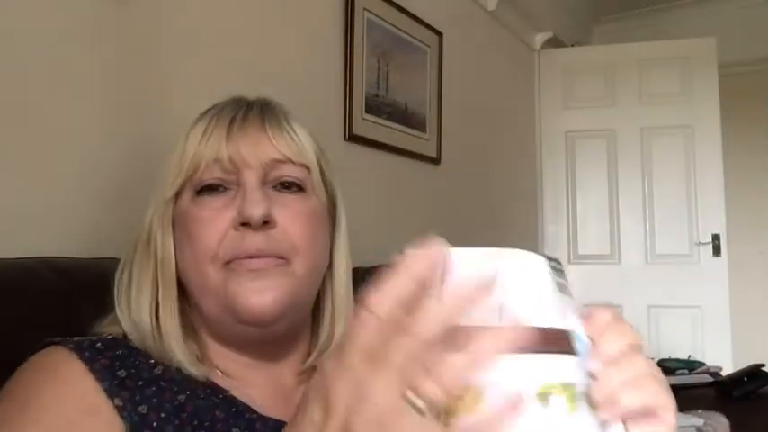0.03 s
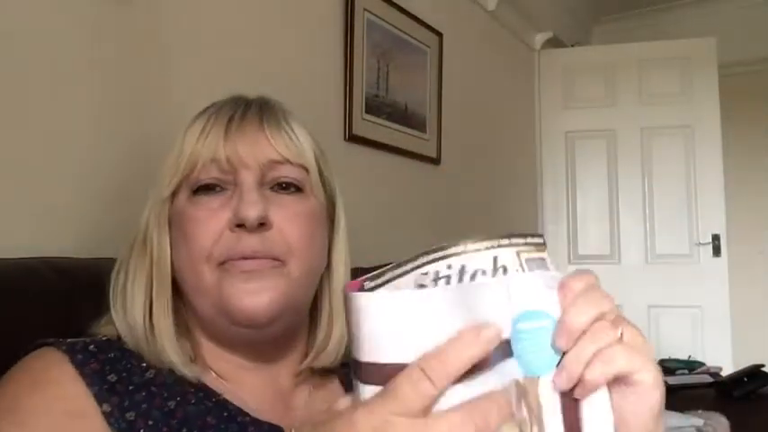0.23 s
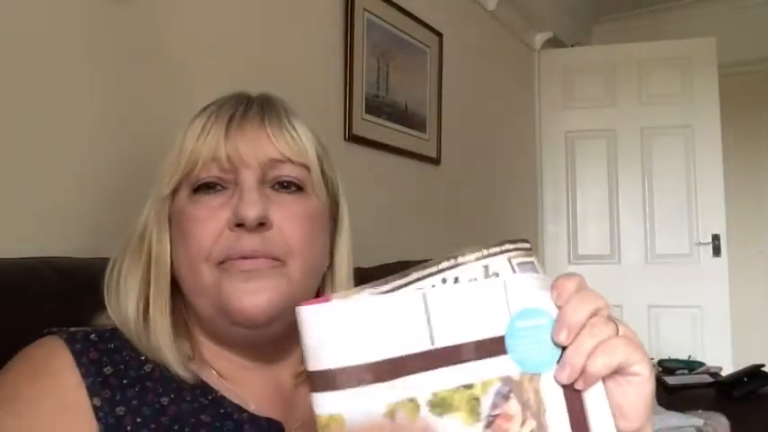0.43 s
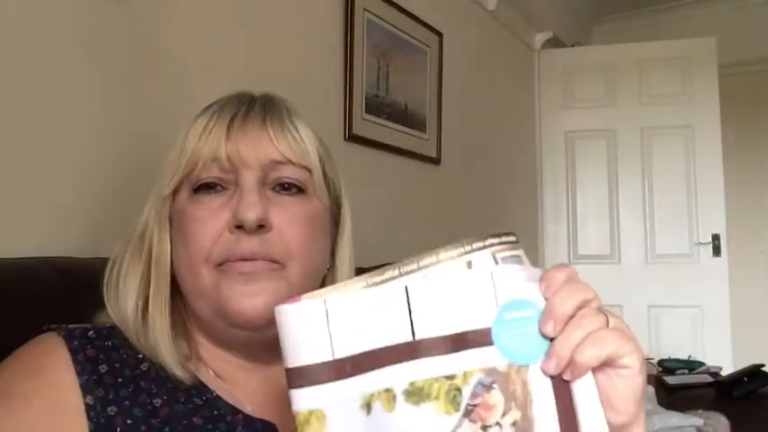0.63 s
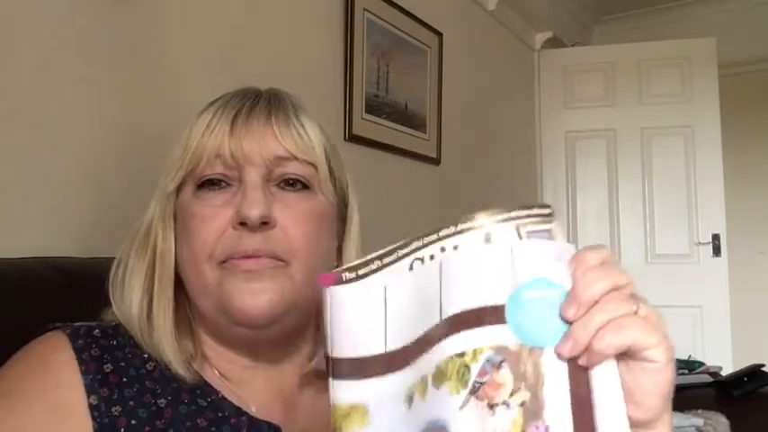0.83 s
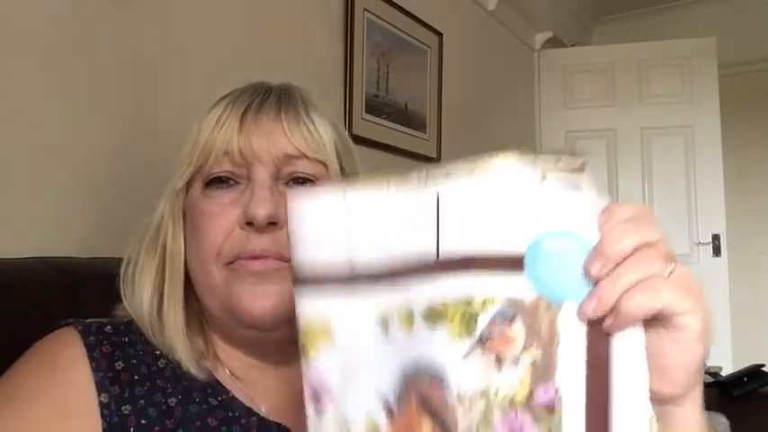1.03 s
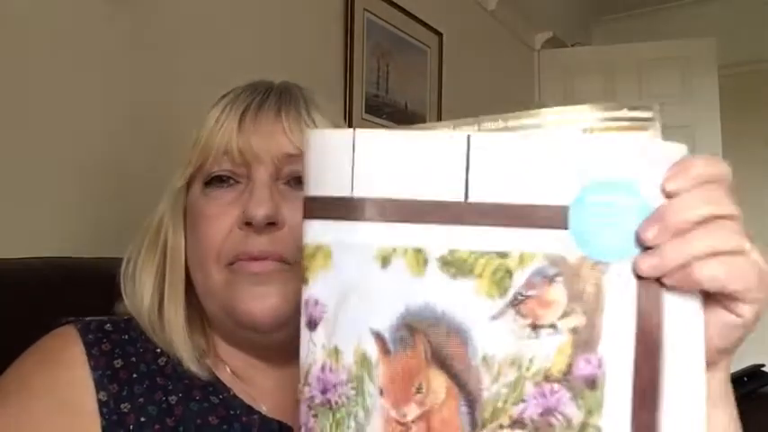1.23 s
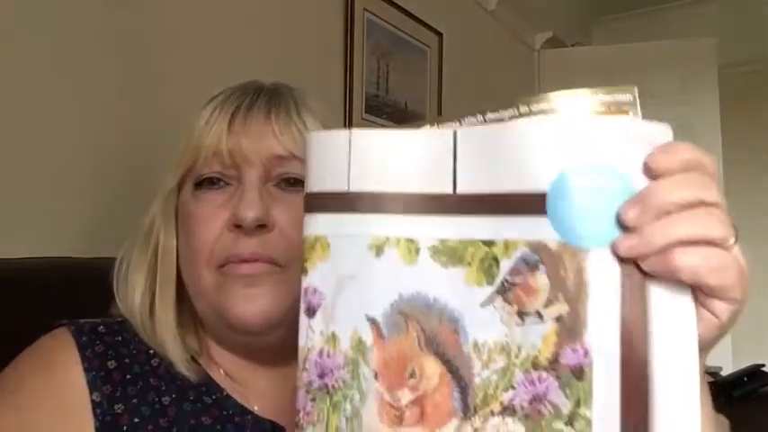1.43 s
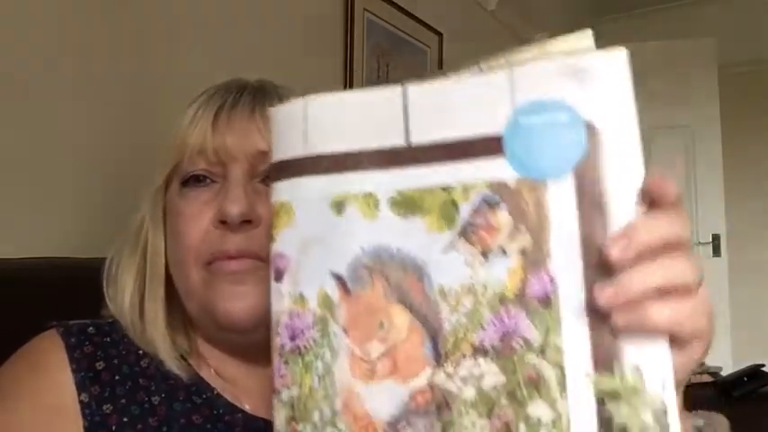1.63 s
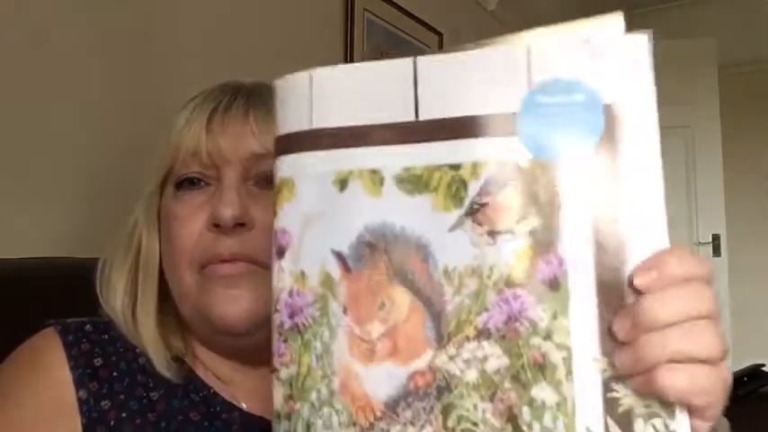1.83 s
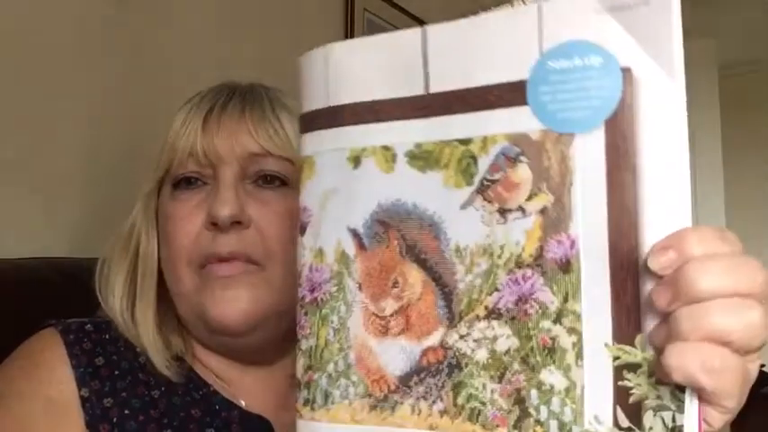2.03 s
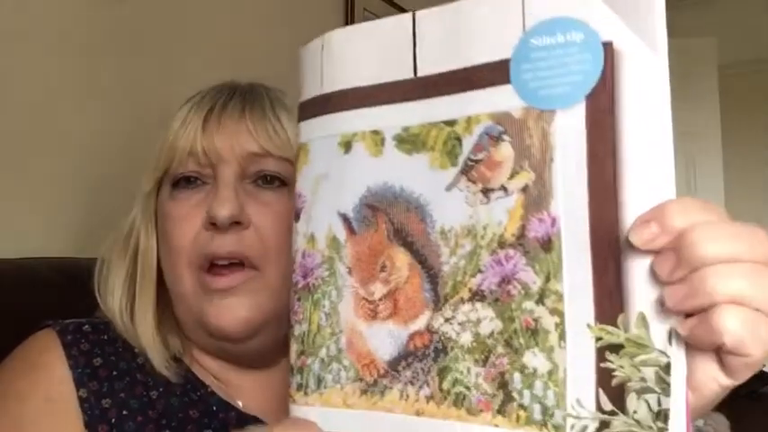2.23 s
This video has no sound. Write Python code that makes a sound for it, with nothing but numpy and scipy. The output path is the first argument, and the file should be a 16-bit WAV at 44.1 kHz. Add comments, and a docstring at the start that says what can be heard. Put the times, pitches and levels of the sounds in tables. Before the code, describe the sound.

Magazine paper rustles close to the microphone in a small furnished room. Rubbing and small crinkles start at once, with a strong page slap near 0.3 s, sliding hiss and another flip around 0.55 s, and sharp snaps at 0.8 to 0.9 s. A bright crackle comes at 1.2 s, fine ticks and a swish around 1.4 to 1.7 s, then near quiet, with a faint crinkle at 2.1 s.

```python
"""In a small living room, a glossy magazine is folded back, turned over and lifted close to a microphone.
Sheets slide and hands rub the cover: hiss and tiny clicks, shaped in strength and spectrum.
The bundle bumps softly (decaying low noise), while creases and edges tick (very short bright clicks).
Slack pages buckle with dull pops and taut ones flip with clean slaps: snaps passed through the page's own spectrum.
A few tones ring on in the paper, and the room rings briefly over a quiet floor of noise."""
import sys
import numpy as np
from scipy import signal
from scipy.fft import rfft, irfft
from scipy.io import wavfile

SR = 44100
rng = np.random.default_rng(int(sys.argv[2]) if len(sys.argv) > 2 else 0)


def wrap_up_sound(samples):
    """Save the sound to the file named by the first command line argument, as 16-bit audio."""
    columns = np.atleast_2d(samples).T
    # keep every value between -1 and 1, then stretch to whole-number steps
    tamed = np.clip(columns, -1, 1)
    steps = np.round(tamed * 32767).astype(np.int16)
    wavfile.write(sys.argv[1], SR, steps)


N = 100283  # length of the scene [samples]
SIZE = 8192  # length of one short sound [samples]

# Friction: average clicks per second, mean of their random extra level,
# and level of the clicks against the hiss, in general and in scuffs
GRAINS_PER_S, GRAIN_SPREAD_DB, GRAIN_DB, SCUFF_GRAIN_DB = 2200, 3, -5, 3
TILT_FROM_HZ = 590  # a treble tilt starts here

# Overall trims of the sliding and rubbing; how steeply the hiss grows with sliding speed
SLIDE_DB, RUB_DB, SLIDE_SWELL = 0.5, -3.5, 1.57
FLOOR_DB = -62.5
BUMP_DECAY_S = 0.02

# Ringing after a tick, a pop or a slap: decay time, and level against the snap
TICK_RING_S, TICK_RING_DB = 0.0032, -1.5
POP_RING_DB = 4
SLAP_RING_S, SLAP_RING_DB = 0.0059, -5
RATTLE_S, RATTLE_DB = 0.0094, -12.5  # neighbouring sheets shiver after a pop

# Delay of the bending wave at 1 kHz in pops and slaps; lowest note of a page
BEND_DELAY_S, SLAP_BEND_S, POP_LOW_HZ = 0.00153, 0.001684, 106

RESONANCE_DB = -13.5  # trim of all the resonances
ROOM_ONSET_S = 0.0023  # build-up time of the reflections
LOW_CUT_HZ, TOP_HZ = 38, 15900  # lower and upper limit of the recorder


def undb(db):
    """Turn decibels into gain."""
    return 10 ** (np.asarray(db) / 20)


def unit(x):
    """Scale a sound to an average strength (rms) of 1."""
    return x / np.sqrt(np.mean(x ** 2))


def burst(x):
    """Scale a short sound to the energy of 10 ms at rms 1."""
    return x * np.sqrt(.01 * SR / np.sum(x ** 2))


def bins(size):
    """List the frequencies of a spectrum [Hz], with at least 1 Hz so that logarithms work."""
    return np.maximum(np.fft.rfftfreq(size, 1 / SR), 1)


def gains(points, size):
    """Draw a gain curve through points (frequency [Hz], level [dB])."""
    hz, db = np.array(points).T
    return undb(np.interp(np.log(bins(size)), np.log(hz), db))


def colour(x, points, tilt=0):
    """Give a sound a spectrum, its treble tilted in dB per octave."""
    octaves = np.log2(np.maximum(bins(len(x)) / TILT_FROM_HZ, 1))
    gain = gains(points, len(x)) * undb(tilt * octaves)
    return irfft(rfft(x) * gain, len(x))


def causal(gain):
    """Make a filter that has these gains and reacts as early as it can (minimum phase)."""
    cepstrum = irfft(np.log(gain + 1e-5))
    # Folding the second half onto the first removes all response before time zero
    cepstrum[1:SIZE // 2] *= 2
    cepstrum[SIZE // 2 + 1:] = 0
    return np.exp(rfft(cepstrum))


def add(out, x, start):
    """Mix a sound in at a time [s]."""
    i = max(int(start * SR), 0)
    out[i:i + len(x)] += x[:max(N - i, 0)]


def friction(grain_db=GRAIN_DB):
    """Fibres catch and let go: tiny clicks of uneven size over a smooth hiss."""
    clicks = (rng.random(N) < GRAINS_PER_S / SR) * np.sign(rng.standard_normal(N))
    sizes = undb(GRAIN_SPREAD_DB * np.minimum(rng.exponential(size=N), 5))
    hiss = rng.standard_normal(N)
    return hiss + undb(grain_db) * unit(clicks * sizes)


def waver(unsteady_db):
    """Quick random changes of strength, up to unsteady_db either way, as the grip shifts."""
    slow_noise = [(1, -20), (12, 0), (40, 0), (140, -24), (500, -80)]  # (frequency [Hz], level [dB])
    chance = unit(colour(rng.standard_normal(N), slow_noise))
    return undb(unsteady_db * np.tanh(chance))


def snap(ring_s, ring_db):
    """Spectrum of a sudden release and the dense, quickly damped ringing of the sheet."""
    ring = rng.standard_normal(SIZE) * np.exp(-np.arange(SIZE) / SR / ring_s)
    x = ring / np.linalg.norm(ring) * undb(ring_db)
    x[0] += 1  # the release itself is one click
    return rfft(x)


def sliding(t):
    """Sheets speed up and slow down against each other; the hiss follows their speed."""
    # One stroke a row: (start [s], fastest [s], end [s], level before the trim [dB], tilt [dB per octave])
    strokes = [(-.03, 0.02, 0.1, -59, -0.5), (.07, 0.16, 0.19, -65, 0), (0.182, 0.192, 0.23, -54, 1),
               (0.206, 0.254, 0.39, -49, -3), (0.29, 0.38, 0.59, -54.5, -2.5),
               (0.406, 0.56, 0.68, -49, -0.5), (0.65, 0.772, 0.88, -53.5, -1),
               (0.87, 0.948, 1.09, -56.5, -3.5), (1.045, 1.121, 1.4, -59, -4.5),
               (1.23, 1.35, 1.5, -67.5, -5), (1.427, 1.506, 1.703, -54.5, -4),
               (1.601, 1.644, 1.73, -52, -4.5), (1.657, 1.755, 1.814, -57.5, -3),
               (1.714, 1.9, 2.035, -65.5, -1.5), (1.98, 2.113, 2.7, -64.5, -1)]
    # Spectrum of sliding paper: (frequency [Hz], relative level [dB])
    slide_colour = [(40, -60), (500, -21.5), (2000, -5.5), (3500, 3), (6000, 2.5), (7400, 0.5), (8900, 3.5),
                    (10000, 1), (13000, 3.5), (15500, -5)]
    out = np.zeros(N)
    for start, fastest, end, db, tilt in strokes:
        speed = np.sin(np.pi / 2 * np.interp(t, [start, fastest, end], [0, 1, 0]))
        hiss = unit(colour(friction(), slide_colour, tilt))
        out += undb(db) * speed ** SLIDE_SWELL * hiss
    return out * undb(SLIDE_DB) * waver(unsteady_db=0.9)


def rubbing(t):
    """Fingers and palms drag on the cover with a duller, rougher friction."""
    # Strength of the rub: (time [s], level before the trim [dB])
    rub_levels = [(0, -51.5), (.07, -47.5), (.14, -60.5), (.27, -43.5), (.36, -53.5), (.6, -50.5),
                  (.68, -68), (.78, -56.5), (.86, -48), (.97, -57.5), (1.28, -58), (1.42, -67), (1.52, -63),
                  (1.66, -71), (1.82, -89), (1.97, -63), (2.07, -75), (2.27, -72)]
    # Spectrum of skin on the cover: (frequency [Hz], relative level [dB])
    rub_colour = [(100, -11), (300, 5), (470, 4.5), (595, 11), (740, 0), (1500, 5.5), (2200, 0),
                  (3200, 0.5), (5000, -9), (9000, -20.5)]
    level = undb(np.interp(t, *np.array(rub_levels).T) + RUB_DB)
    return level * waver(unsteady_db=5.5) * unit(colour(friction(), rub_colour))


def quiet_floor():
    """A steady, mostly low background noise."""
    # Spectrum of the background: (frequency [Hz], relative level [dB])
    floor_colour = [(20, -44), (40, -6), (62, 0), (120, 0.5), (220, 1.5), (450, -8), (1000, -16),
                    (3000, -12), (8000, -38), (15500, -61)]
    return undb(FLOOR_DB) * unit(colour(rng.standard_normal(N), floor_colour))


def bumps():
    """Soft low thuds of the whole bundle in the hands: dying noise with little treble."""
    # One bump a row: (time [s], level before doubling [dB])
    bump_rows = [(.002, -54), (0.048, -55.5), (.16, -61), (0.243, -56.5), (0.329, -62), (.56, -56),
                 (0.822, -52.5), (.884, -51.5), (1.097, -60.5), (1.39, -58.5), (1.852, -65)]
    # Spectrum of a thud: (frequency [Hz], relative level [dB])
    bump_colour = [(25, -42), (45, -12), (65, 4.5), (110, -5.5), (200, 1), (400, -14.5), (1200, -61.5)]
    out, age = np.zeros(N), np.arange(SIZE) / SR
    for start, db in bump_rows:
        push = rng.standard_normal(SIZE) * np.exp(-age / BUMP_DECAY_S)
        thud = irfft(rfft(push) * causal(gains(bump_colour, SIZE)))
        add(out, undb(db) * 2 * burst(thud), start)
    return out


def ticks():
    """Small creases and edges give way with bright, very short clicks."""
    # One tick a row: (time [s], level [dB], centre [Hz], width [octaves])
    tick_rows = [(0.0219, -51, 3000, 1.44), (0.059, -50.5, 2880, 1), (.097, -55, 5850, 1.1),
                 (.1785, -54.5, 1930, 1.3), (.188, -51, 4940, 0.43), (0.2364, -47, 10900, 2.4),
                 (0.815, -42, 3870, 0.41), (.912, -63, 10100, 0.45), (1.094, -57, 5440, 4),
                 (1.337, -52, 3940, 0.89), (1.39, -56, 5800, .6), (1.434, -48.5, 12800, 1.44),
                 (1.4535, -40.5, 4200, 1.9), (1.4535, -49.5, 13000, 0.32), (1.461, -51, 13000, 0.96),
                 (1.484, -47.5, 9820, 4.9), (1.4884, -42.5, 11100, 2.1), (1.493, -48, 13100, 0.35),
                 (1.5079, -49.5, 9000, 1.1), (1.5164, -46.5, 3140, 0.84), (1.534, -55, 12000, 0.68),
                 (1.942, -60, 2900, .5)]
    out, f = np.zeros(N), bins(SIZE)
    for start, db, hz, width in tick_rows:
        hump = 1 / (1 + .5 * (np.log2(f / hz) / width) ** 2) ** 2
        gain = hump / np.hypot(1, (f / TOP_HZ) ** 10)
        click = irfft(snap(TICK_RING_S, TICK_RING_DB) * causal(gain))
        add(out, undb(db) * burst(click), start)
    return out


def page(hz, rise, fall):
    """Gains of a bent page: a rise to a corner, a fall above it, fading out under its lowest note."""
    f = bins(SIZE)
    octaves = np.log2(f / hz)
    corner = 1 / np.hypot(undb(-rise * octaves), undb(fall * octaves))
    return corner / np.hypot(1, (POP_LOW_HZ / f) ** 2)


def bend(delay_s):
    """The bending wave brings the lows a little late: the delay shrinks as the frequency rises."""
    return np.exp(-4j * np.pi * delay_s * np.sqrt(1000 * bins(SIZE)))


def rattle():
    """Spectrum of the loose sheets shivering just after a pop."""
    age = np.arange(SIZE) / SR / RATTLE_S  # counted in decay times
    x = rng.standard_normal(SIZE) * np.sqrt(age) * np.exp(-age)
    return rfft(x / np.linalg.norm(x)) * undb(RATTLE_DB)


def pops():
    """Slack pages flip their curve and shiver against their neighbours."""
    # One loose buckle a row: (time [s], level [dB], corner of its spectrum [Hz],
    # rise below the corner [dB per octave], fall above it [dB per octave], ring [s])
    pop_rows = [(0.0427, -46.5, 1690, 4.5, 24, 0.0018), (0.054, -50, 900, -1.5, 29, 0.0027),
                (0.063, -45, 775, 1.5, 17, 0.0016), (0.241, -46.5, 570, 3.5, 37, 0.0036),
                (.347, -47, 720, 7.5, 20, .012), (0.461, -46, 995, 2, 14, 0.016),
                (.472, -46, 1000, 1, 4.5, 0.0069), (0.562, -43, 970, 10, 47, 0.0041),
                (.589, -43.5, 1100, 0.5, 12.5, 0.022), (0.8233, -38, 1710, 1, 14, 0.0057),
                (0.849, -41.5, 1700, 11.5, 15, 0.023), (0.8837, -41.5, 1950, 3, 26, 0.0018),
                (0.9116, -41.5, 1410, 0.5, 10, 0.00094), (1.062, -51, 1660, 1.5, 10, 0.0015),
                (1.094, -44.5, 600, -4, 1.5, 0.0053), (1.1832, -43.5, 3900, 2, 18, 0.0062),
                (1.337, -49, 487, 2.5, 11.5, 0.0097), (1.509, -50, 704, -7, 1, 0.0044),
                (1.5543, -50, 1100, -1, 11, 0.0059), (2.086, -55, 306, -2, 10, 0.011),
                (2.104, -46, 2610, 5.5, 35, 0.0072), (2.1085, -46, 2600, 10, 17, 0.0035),
                (2.218, -55, 274, 0, 17, 0.0043)]
    out = np.zeros(N)
    for start, db, hz, rise, fall, ring_s in pop_rows:
        source = snap(ring_s, POP_RING_DB) + rattle()
        sound = source * causal(page(hz, rise, fall)) * bend(BEND_DELAY_S)
        add(out, undb(db) * burst(irfft(sound)), start - BEND_DELAY_S / 2)
    return out


def scuffs(t):
    """Short, crackly slips of sheet on sheet that swell and die."""
    # One scuff a row: (time of the peak [s], level [dB], rise [s], decay [s], tilt [dB per octave])
    scuff_rows = [(.105, -48.5, .008, 0.0041, -3), (1.179, -37, 0.0014, 0.0062, -5),
                  (1.198, -47.5, 0.016, 0.016, -1.5), (1.219, -29, 0.0031, 0.0035, -1.5),
                  (1.227, -40.5, 0.0031, 0.022, -3), (2.092, -50, 0.032, 0.036, -4),
                  (2.1098, -43, 0.0078, 0.0028, 1.5)]
    # Spectrum of a scuff: (frequency [Hz], relative level [dB])
    scuff_colour = [(30, -37), (200, -5), (550, -7), (1000, -8.5), (2000, -2), (3600, 3), (7000, 0),
                    (8900, 4), (12000, -2), (15500, -8)]
    out = np.zeros(N)
    for peak, db, rise_s, decay_s, tilt in scuff_rows:
        envelope = np.exp(-np.maximum((peak - t) / rise_s, (t - peak) / decay_s))
        crackle = unit(colour(friction(SCUFF_GRAIN_DB), scuff_colour, tilt))
        out += undb(db) * envelope * crackle
    return out


def slaps():
    """Taut pages flip in one clean slap and ring at one note, with a faint shiver of the sheet."""
    # One slap a row: (time [s], level [dB], corner [Hz], rise [dB per octave], fall [dB per octave],
    # note [Hz], width of the note [Hz], strength of the note [dB])
    slap_rows = [(.129, -46.5, 3730, -0.5, 23, 2970, 900, 6), (0.1586, -44.5, 1100, 3, 12, 592, 80, 16),
                 (.178, -41, 1500, -2.5, 11, 580, 89, 14), (0.3178, -28.8, 920, 3.5, 17.5, 546, 130, 10.5),
                 (.3275, -40.5, 900, 13, 17, 720, 60, 15), (0.5548, -36.5, 1350, 1, 47, 1220, 280, 6.5),
                 (0.8155, -29, 1990, 3.5, 23.5, 1420, 800, 2), (.8813, -30.5, 2840, 3, 42, 1180, 377, 11),
                 (1.219, -47, 750, 11, 15, 570, 59.6, 26), (1.3898, -44, 3140, -1, 20, 2900, 600, 12)]
    out = np.zeros(N)
    for start, db, hz, rise, fall, note_hz, width_hz, note_db in slap_rows:
        peak = undb(note_db) / np.hypot(1, 2 * (bins(SIZE) - note_hz) / width_hz)
        note = np.hypot(1, peak)
        source = snap(SLAP_RING_S, SLAP_RING_DB)
        sound = source * causal(page(hz, rise, fall) * note) * bend(SLAP_BEND_S)
        add(out, undb(db) * burst(irfft(sound)), start - SLAP_BEND_S / 2)
    return out


def resonate(x):
    """The folded bundle and the space around it favour a few tones, which ring on after the paper moves."""
    # Narrow resonances: (frequency [Hz], time to fall by 60 dB [s], level before the trim [dB])
    tones = [(222, .25, -12), (540, .25, -1), (585, .25, -3), (760, .15, -3), (1158, .12, -7),
             (1310, .1, -3), (8885, .08, -3)]
    out = x.copy()
    for hz, t60, db in tones:
        damping = np.log(1000) / (t60 * SR)  # loss per sample
        pole = np.exp(2j * np.pi * hz / SR - damping)
        ringing = signal.lfilter([1], [1, -pole], x).real
        out += undb(db + RESONANCE_DB) * 2 * damping * ringing
    return out


def room(x):
    """Dense reflections of a furnished room: noise bands that die away, the top one fastest."""
    # Bands of the room: (centre [Hz], time to fall by 60 dB [s], level against the direct sound [dB])
    room_bands = [(149, 1, -11), (600, 0.28, -8.5), (1470, 0.47, -10.5), (4040, 0.78, -13.5),
                  (11600, 0.18, -9.5)]
    size = SR // 2
    age, noise, tail = np.arange(size) / SR, rfft(rng.standard_normal(size)), 0
    centres = np.log([row[0] for row in room_bands])
    # Each share is 1 at its own centre and 0 at the others, so neighbouring bands crossfade
    for share, (hz, t60, db) in zip(np.eye(len(room_bands)), room_bands):
        band = irfft(noise * np.interp(np.log(bins(size)), centres, share), size)
        build_up = 1 - np.exp(-(age / ROOM_ONSET_S) ** 2)
        envelope = np.exp(-np.log(1000) * age / t60) * build_up
        tail = tail + undb(db) * band * envelope / np.linalg.norm(envelope)
    return x + signal.fftconvolve(x, tail)[:N]


def scene():
    """The magazine in the room, the same in both channels."""
    t = np.arange(N) / SR
    movements = sliding(t) + rubbing(t) + ticks() + pops() + scuffs(t) + slaps()
    magazine = resonate(movements) + bumps()
    mono = room(magazine) + quiet_floor()
    return np.array([mono, mono])


def record(dry):
    """The recorder cuts the deepest bass and the highest treble."""
    low_cut = signal.butter(4, LOW_CUT_HZ, "high", fs=SR, output="sos")
    top_cut = signal.ellip(10, .1, 80, TOP_HZ, fs=SR, output="sos")
    thin = signal.sosfilt(low_cut, dry)
    return signal.sosfilt(top_cut, thin)


dry = scene()
out = record(dry)
wrap_up_sound(out)
```